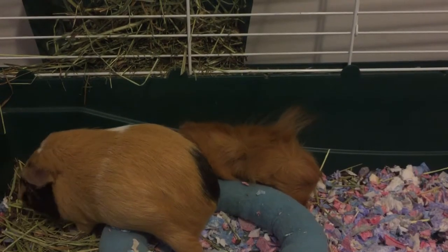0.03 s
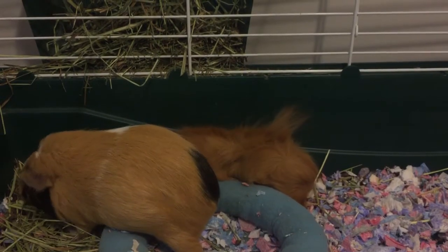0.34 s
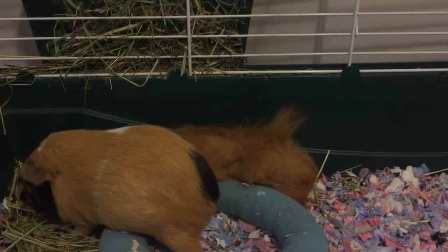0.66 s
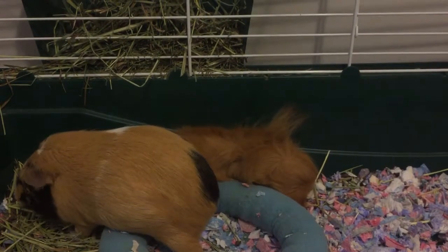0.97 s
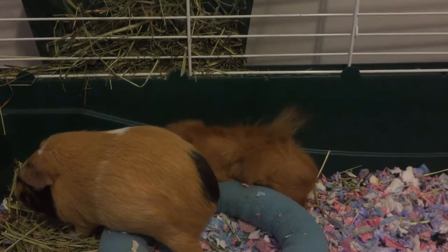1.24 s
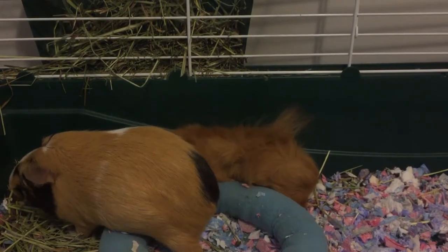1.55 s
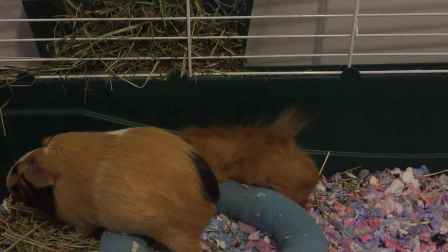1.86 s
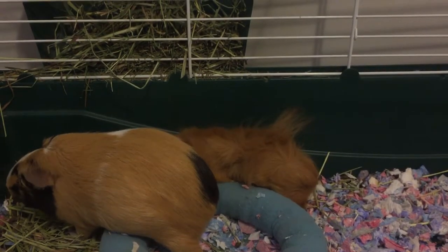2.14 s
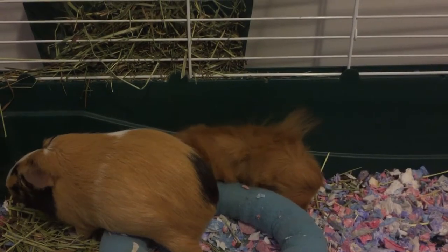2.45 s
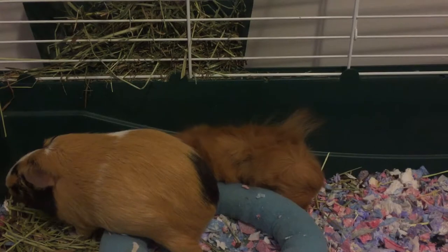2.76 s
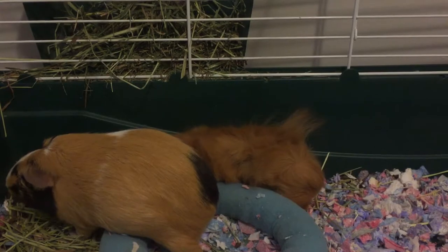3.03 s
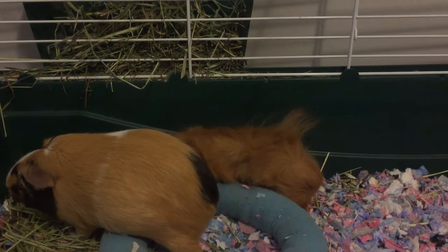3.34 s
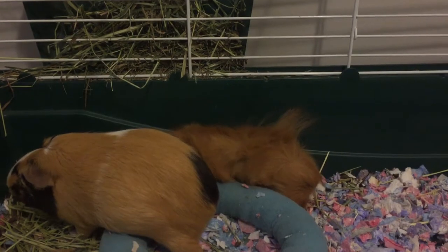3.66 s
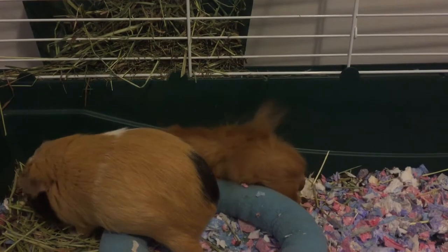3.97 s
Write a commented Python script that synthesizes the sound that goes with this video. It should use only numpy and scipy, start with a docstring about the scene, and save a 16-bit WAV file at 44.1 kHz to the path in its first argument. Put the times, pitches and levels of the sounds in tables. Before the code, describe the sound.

Close to a cage, guinea pigs make short, whistling squeaks, higher at first and then lower. Tiny bedding rustles, soft chews and a couple of light knocks on plastic come through over a steady low room hum.

```python
"""A quiet room with a mains hum, close to a cage of squeaking guinea pigs.
Each squeak is a whistled harmonic tone, filtered by the throat, that swoops up from a low note;
the first ones trail off high. Hay and paper bedding crackle in clusters of tiny snaps, with soft
chewing among them. Paws pad and shuffle, and a few knocks excite the plastic tray's damped modes."""
import sys
import numpy as np
from scipy import signal
from scipy.fft import rfft, irfft
from scipy.io import wavfile
from scipy.ndimage import uniform_filter1d

SR = 44100
rng = np.random.default_rng(int(sys.argv[2]) if len(sys.argv) > 2 else 0)


def output_pcm(signal):
    """Save a mono or channel-first signal as 16-bit PCM at the path in sys.argv[1].

    Samples are clipped to [-1, 1] before scaling.
    """
    pcm = np.clip(np.atleast_2d(signal).T, -1, 1) * 32767
    wavfile.write(sys.argv[1], SR, np.round(pcm).astype(np.int16))


N = 176400

# One contour per squeak (time [s], pitch [Hz], source level [dB])
SQUEAK_CONTOURS = [
    [(0.0, 1509, -52), (0.041, 1492, -46.5), (0.071, 1400, -49.5), (0.105, 1500, -49), (0.128, 1479, -46),
     (0.142, 1200, -51)],
    [(0.321, 643, -54), (0.354, 899, -50.5), (0.374, 1117, -45), (0.39, 1509, -52), (0.399, 1762, -51),
     (0.414, 1817, -48.5), (0.46, 1690, -58), (0.47, 1501, -52), (0.52, 1454, -46), (0.576, 1385, -40.5),
     (0.583, 1341, -46.5), (0.622, 1252, -44.5), (0.634, 1086, -52)],
    [(0.767, 827, -51), (0.788, 860.5, -47), (0.812, 739, -51.5), (0.821, 883, -46.5), (0.84, 1312, -49),
     (0.859, 1820, -51), (0.875, 1897, -52), (0.897, 1541, -49), (0.914, 1360, -44.5), (0.942, 1378, -44.5),
     (0.955, 1419, -51), (0.981, 1463, -44.5), (0.995, 1160, -50.5)],
    [(1.139, 713, -53), (1.167, 805, -50.5), (1.174, 738, -52.5), (1.198, 862, -45.5), (1.212, 1222, -45.5),
     (1.226, 1807, -51.5), (1.237, 1540, -49.5), (1.253, 927, -48.5), (1.266, 706, -46.5),
     (1.302, 766, -47.5), (1.313, 860, -51.5), (1.334, 1150, -45), (1.356, 870, -52)],
    [(1.483, 727, -50), (1.502, 702, -48), (1.525, 860, -47), (1.533, 989, -46), (1.564, 1980, -47),
     (1.572, 2194, -44.5), (1.58, 1675, -44)],
    [(1.627, 760, -51), (1.635, 745, -51.5), (1.647, 714, -61)],
    [(1.784, 980, -52), (1.8, 768, -50.5), (1.831, 769, -48), (1.843, 725, -50.5), (1.853, 960, -49.5),
     (1.869, 1580, -52), (1.877, 1950, -44.5), (1.888, 1520, -53)],
    [(1.905, 932, -46.5), (1.92, 750, -49), (1.949, 762, -48), (1.963, 715, -52), (1.978, 1244, -52.5),
     (1.986, 1390, -51), (2.0, 1312, -49), (2.018, 968, -48.5), (2.038, 864, -49.5), (2.073, 919, -51)],
    [(2.269, 736, -56.5), (2.296, 729, -49.5), (2.318, 670, -48.5), (2.334, 1155, -54.5),
     (2.343, 1230, -44.5), (2.354, 1130, -52)],
    [(2.365, 787, -53), (2.383, 564.5, -47), (2.407, 590, -52), (2.427, 787, -49.5), (2.437, 710, -54.5),
     (2.465, 756, -76)],
    [(2.664, 705, -58), (2.677, 558, -57), (2.687, 747, -54), (2.7, 709, -50), (2.717, 842, -55.5),
     (2.731, 860, -48), (2.743, 634, -50.5), (2.751, 591.4, -50.5), (2.772, 602, -53.5)],
]
# Source spectrum, from the fundamental up (relative level [dB])
HARMONICS_DB = [0, -9, -12, -18, -18, -48, -43, -52]
# Brightness of each squeak (overtone tilt [dB/octave])
OVERTONE_TILTS = [1.4, -1.4, -2, -0.46, 0.61, -2.2, 2.1, 1.8, -0.4, -0.98, -0.53]
# Throat response (frequency [Hz], gain [dB])
THROAT = [(400, -19), (600, 3), (740, 0.5), (850, -1.5), (1250, -6), (1700, -1.5), (1950, 0), (2200, -0.5),
          (2500, -3), (2900, -4.5), (3500, 4), (4600, -20.5), (5700, 6.5), (6400, 3), (7100, 4),
          (9000, -15), (15000, -10)]
# Splitting of the voice by period doubling (time [s], modulation depth [dB])
VOICE_SPLIT = [(.45, -40), (.485, 0), (.54, -10), (.6, -38)]
ATTACK_S, RELEASE_S = 0.0021, 0.0041
JITTER, JITTER_HZ, SHIMMER_DB, SHIMMER_HZ, RASP_DB = 0.0088, 202, 1.22, 87, -24
SHELF_HZ, SHELF_WIDTH_HZ, SHELF_DB = 3056, 70, -22
NOTCH_HZ, NOTCH_WIDTH_HZ, NOTCH_DB = 1425, 89, -15


def squeaks():
    """Source and filter: harmonics glide through a fixed throat. Returns direct and room-bound sound."""
    direct, to_room = np.zeros((2, N))
    jitter, shimmer, rasp = wander(JITTER_HZ), wander(SHIMMER_HZ), wander(1000)
    for contour, tilt in zip(SQUEAK_CONTOURS, OVERTONE_TILTS):
        times, pitch, source_db = np.transpose(contour)
        span = np.arange(int(times[0] * SR), int(times[-1] * SR))
        t = span / SR
        hz = np.interp(t, times, pitch) * (1 + JITTER * jitter[span])
        phase = 2 * np.pi * np.cumsum(hz) / SR
        release = np.clip((t[-1] - t) / RELEASE_S, 0, 1)
        effort = amp(np.interp(t, times, source_db) + SHIMMER_DB * shimmer[span])
        level = np.sqrt(2) * release * effort * (1 + amp(RASP_DB) * rasp[span])
        # Modulating the fundamental at half pitch puts sidebands at 1/2 and 3/2 of it.
        split = amp(np.interp(t, *np.transpose(VOICE_SPLIT))) * np.cos(phase / 2)
        for k, db in enumerate(HARMONICS_DB, 1):
            shelf_db = SHELF_DB * (1 + np.tanh((k * hz - SHELF_HZ) / SHELF_WIDTH_HZ)) / 2
            throat_db = lookup(THROAT, k * hz) + shelf_db
            onset = np.clip((t - t[0]) / (k * ATTACK_S), 0, 1)  # higher harmonics rise more slowly
            weight = 1 + split if k == 1 else amp(tilt * np.log2(k))
            partial = onset * level * weight * amp(db + throat_db) * np.sin(k * phase)
            to_room[span] += partial
            # Destructive interference: a reflection cancels one band of the direct sound.
            notch_db = NOTCH_DB * np.exp(-((k * hz - NOTCH_HZ) / NOTCH_WIDTH_HZ) ** 2)
            direct[span] += partial * amp(notch_db)
    return direct, to_room


# Crunches of hay and bedding (time [s], duration [s], level [dB], tilt [dB/octave])
CRUNCHES = [(0.043, 0.0092, -61, 4), (.229, 0.033, -57, 0), (.285, 0.0074, -54.5, -2.5),
            (.293, .025, -64, 3), (0.417, 0.006, -66, -1.5), (0.427, 0.022, -55.5, -1),
            (0.477, 0.027, -64, -3), (0.8, 0.038, -65.5, 0.5), (1.124, 0.034, -59.5, -1.5),
            (1.29, 0.064, -68.5, -3), (1.2974, .005, -54, -6), (1.368, 0.0064, -57, 0),
            (1.371, 0.027, -73, -15), (1.471, 0.0041, -64.5, -3)]
# Soft chews (time [s], duration [s], level [dB])
CHEWS = [(0.591, 0.023, -65), (0.782, 0.0077, -63), (0.932, 0.058, -72), (2.392, 0.014, -71),
         (2.412, 0.012, -67.5), (2.561, 0.023, -70), (2.74, 0.018, -73), (2.942, 0.0072, -68),
         (3.259, 0.025, -75)]
# Spectra of a crunch, a chew and stirring bedding (frequency [Hz], relative level [dB])
HAY_SPECTRUM = [(300, -14), (1000, -9), (2500, -8), (3600, -15), (5000, -7.5), (6200, 2), (8000, -6.5),
                (10500, -4.5), (13000, -1.5), (16000, 1.5)]
CHEW_SPECTRUM = [(500, -22), (2600, 1.5), (3800, -8.5), (5300, 0.5), (6500, -6.5), (8500, -19.5),
                 (15000, -18)]
STIR_SPECTRUM = [(300, -0.5), (600, -2.5), (1200, 6), (2400, 3), (3800, -11), (5800, -2), (9000, -13),
                 (16000, -46)]
STIR_DB, STIRS_PER_S, STIR_SWELL_DB, STIR_SWELL_HZ = -78, 610, 3.5, 32


def hay():
    """Shot noise: dense clicks make crunches and chews, sparse ones a faint continual stirring."""
    stirring = snaps(STIRS_PER_S) * amp(STIR_SWELL_DB * wander(STIR_SWELL_HZ))
    out = amp(STIR_DB) * colour(stirring, STIR_SPECTRUM)
    for start, duration, db, tilt in CRUNCHES:
        add(out, start, amp(db) * crunch(duration, HAY_SPECTRUM, tilt))
    for start, duration, db in CHEWS:
        add(out, start, amp(db) * crunch(duration, CHEW_SPECTRUM))
    return out


def crunch(duration, spectrum, tilt=0, rise_fraction=0.34, fade_db=-7, stalk_db=4.5):
    """Brittle fracture: a cluster of snaps swells and fades, each stalk with its own bright bands."""
    progress = np.arange(0, duration, 1 / SR) / duration
    n = len(progress)
    envelope = np.minimum(progress / rise_fraction, 1) * amp(fade_db * progress)
    burst = np.pad(snaps(per_s=4000)[:n] * envelope, (0, SR // 10))
    bands = signal.stft(burst, nperseg=128)[2]
    stalks = uniform_filter1d(rng.standard_normal((len(bands), 256)), size=3, axis=0)  # across bands
    stalks = unit(uniform_filter1d(stalks, size=6, axis=1))  # along time
    burst = signal.istft(bands * amp(stalk_db * stalks[:, :bands.shape[1]]), nperseg=128)[1]
    return unit(colour(burst, spectrum, tilt)[:n])


def snaps(per_s, spread_db=3):
    """A Poisson process: independent clicks of uneven size and random sign."""
    size = amp(spread_db * np.minimum(rng.exponential(1, N), 4))
    return size * rng.choice([-1, 1], N) * (rng.random(N) < per_s / SR)


# Knocks on the tray (time [s], level [dB])
KNOCKS = [(1.401, -42.5), (1.409, -48), (3.607, -62), (3.753, -59), (3.882, -39), (3.903, -63)]
# Modes of the tray (frequency [Hz], relative level [dB], 60 dB decay time [s])
TRAY_MODES = [(621, -1.5, 0.023), (712, 4, 0.017), (860, -3, 0.013), (1430, -2, 0.0089)]


def tray(rise_s=0.0014):
    """Modal vibration: each knock excites the same damped resonances of the plastic."""
    out, t = np.zeros(N), np.arange(SR // 10) / SR
    ring = sum(amp(db - 60 * t / t60) * np.sin(2 * np.pi * hz * t) for hz, db, t60 in TRAY_MODES)
    ring *= 1 - np.exp(-t / rise_s)
    for start, db in KNOCKS:
        add(out, start, amp(db) * ring)
    return out


# Footfalls (time [s], level [dB], frequency [Hz])
FOOTFALLS = [(.046, -58, 472), (0.149, -59.5, 350), (0.265, -53, 330), (0.607, -57, 410), (0.964, -59, 483),
             (1.183, -59, 372), (1.46, -54, 580)]
# Shuffles on the tray floor (time [s], duration [s], level [dB])
SHUFFLES = [(1.133, 0.032, -59.5), (1.31, 0.1, -62.5), (1.397, 0.035, -52), (1.419, 0.084, -63.5),
            (3.795, 0.125, -72)]
# Spectrum of a shuffle (frequency [Hz], relative level [dB])
SHUFFLE_SPECTRUM = [(40, -2), (90, -1), (170, 5), (300, 2), (450, -3.5), (620, -3.5), (1050, -8.5),
                    (1500, -40.5), (3000, -34), (8000, -45)]


def paws(rise_s=0.0037):
    """Impact and friction: a footfall is one damped tone, a shuffle a swell of dull noise."""
    out, t = np.zeros(N), np.arange(SR // 10) / SR
    envelope = t / rise_s * np.exp(1 - t / rise_s)
    for start, db, hz in FOOTFALLS:
        add(out, start, amp(db) * envelope * np.sin(2 * np.pi * hz * t))
    for start, duration, db in SHUFFLES:
        n = int(duration * SR)
        friction = colour(rng.standard_normal(N), SHUFFLE_SPECTRUM)[:n]
        add(out, start, amp(db) * unit(friction * signal.windows.tukey(n, 0.5)))
    return out


# Reverberant field (frequency [Hz], 60 dB decay time [s], gain [dB])
REVERBERATION = [(200, 0.1, -29), (750, 0.3, -8), (890, 0.27, -7), (1500, 0.23, -8.5), (2330, 0.14, -15),
                 (3000, 0.29, -13), (5560, 0.24, -3), (15000, 0.18, -7.5)]


def room(sound, rise_s=0.008):
    """Diffuse reverberation: convolution with a noise tail, each band decaying at its own rate."""
    hz, t, bands = signal.stft(rng.standard_normal(SR // 2), SR, nperseg=256)
    t60 = lookup(REVERBERATION, hz)[:, None]
    gain_db = lookup(REVERBERATION, hz, column=2)[:, None]
    unit_energy = np.sqrt(2 * np.log(1000) / (t60 * SR))
    tail = signal.istft(bands * amp(gain_db - 60 * t / t60) * unit_energy, SR, nperseg=256)[1]
    build_up = np.minimum(np.arange(len(tail)) / SR / rise_s, 1)
    return signal.fftconvolve(sound, tail * build_up)[:N]


# Mains hum and motor drone (frequency [Hz], rms level [dB], rms waver [dB])
HUM_LINES = [(59.64, -51.5, 1.43), (119.7, -50, 1.55), (86, -66, 6)]
# Spectrum of the room noise (frequency [Hz], relative level [dB])
AIR_SPECTRUM = [(15, -16), (33, -24), (48, 10), (75, 5.5), (105, 7), (140, -0.5), (170, -3.5), (250, -12.5),
                (330, -12.5), (500, -16.5), (900, -26), (2000, -26), (3500, -27), (6500, -31.5),
                (8000, -33), (9500, -31), (10300, -36), (12500, -33), (15500, -37)]
WAVER_HZ, OVERTONE_HZ, OVERTONE_DB, AIR_DB = 3.26, 239.4, -80, -58.5


def background():
    """Line and continuous spectra: mains hum and a motor's drone lie over low room noise."""
    t = np.arange(N) / SR
    hum = amp(OVERTONE_DB) * np.sin(2 * np.pi * OVERTONE_HZ * t)  # one faint, steady overtone
    for hz, db, waver_db in HUM_LINES:
        level = amp(db + waver_db * wander(WAVER_HZ))
        hum += level * np.sin(2 * np.pi * (hz * t + rng.random()))
    return np.sqrt(2) * hum + amp(AIR_DB) * colour(rng.standard_normal(N), AIR_SPECTRUM)


def amp(db):
    """Decibels to amplitude ratio."""
    return 10 ** (np.asarray(db) / 20)


def unit(x):
    """Normalisation to rms 1."""
    return x / np.sqrt(np.mean(x ** 2) + 1e-20)


def lookup(points, hz, column=1):
    """Interpolation of a table column along log frequency."""
    table = np.array(points, float)
    return np.interp(np.log(hz + 1), np.log(table[:, 0] + 1), table[:, column])


def add(mix, start, sound):
    """Superposition of a sound on the mix from a start time [s]."""
    part = mix[round(start * SR):][:len(sound)]
    part += sound[:len(part)]


def colour(x, spectrum, tilt=0):
    """Linear filtering by a spectrum and a tilt [dB/octave]; rms 1."""
    hz = np.fft.rfftfreq(len(x), 1 / SR)
    gain_db = lookup(spectrum, hz) + tilt * np.log2((hz + 1) / 7000)
    return unit(irfft(rfft(x) * amp(gain_db), len(x)))


def wander(rate_hz):
    """Low-pass noise: random motion up to about the given rate; rms 1."""
    hz = np.fft.rfftfreq(N, 1 / SR)
    return unit(irfft(rfft(rng.standard_normal(N)) * np.exp(-(hz / rate_hz) ** 2), N))


def scene():
    """Superposition: direct squeaks and cage noises, their reverberation and the background."""
    direct, to_room = squeaks()
    cage = hay() + tray() + paws()
    return (direct + cage + room(to_room + cage) + background())[None]


def record(dry, cutoff_hz=15830):
    """Band limiting: a low-pass filter removes the highest treble."""
    low_pass = signal.firwin(1023, cutoff_hz, window=("kaiser", 9), fs=SR)
    return signal.oaconvolve(dry, low_pass[None], "same")


dry = scene()
out = record(dry)
output_pcm(out)
```